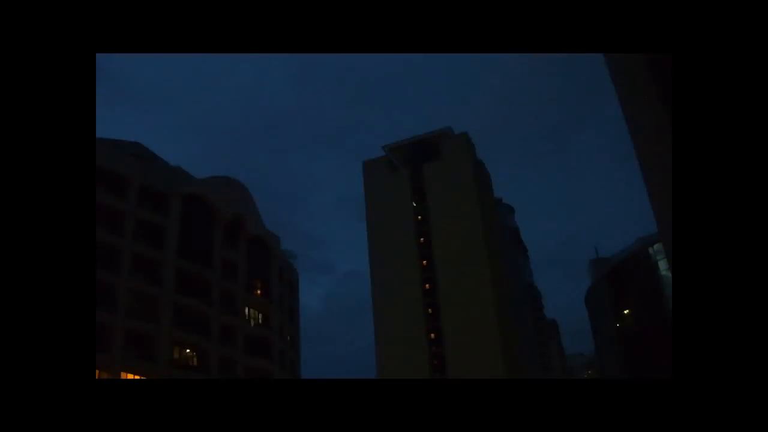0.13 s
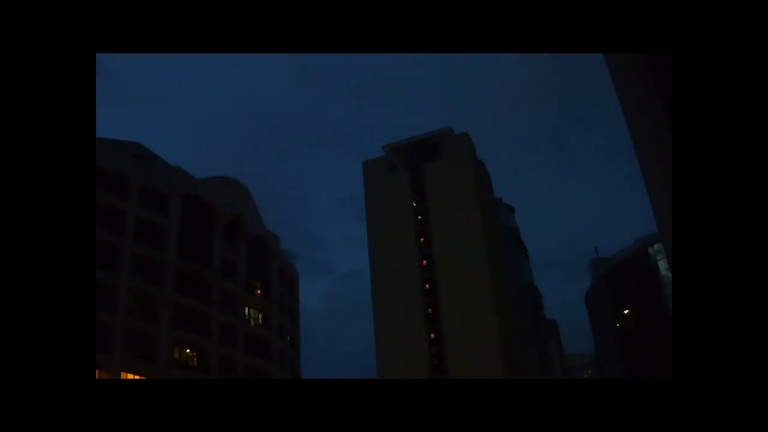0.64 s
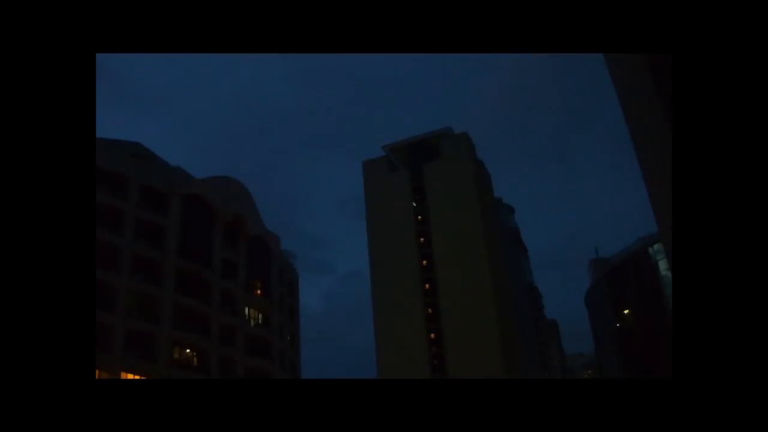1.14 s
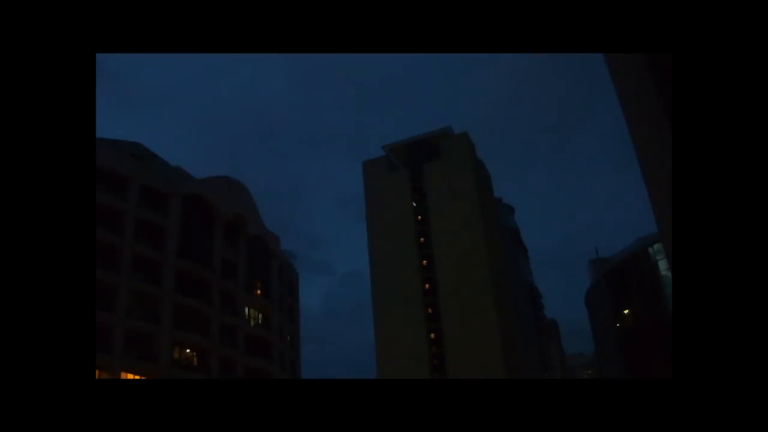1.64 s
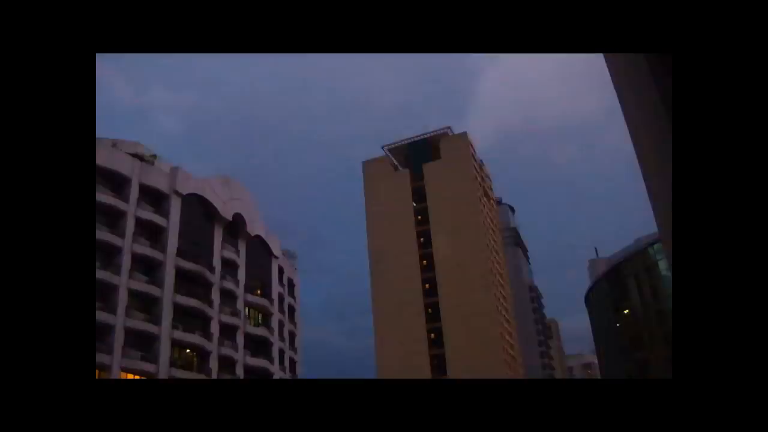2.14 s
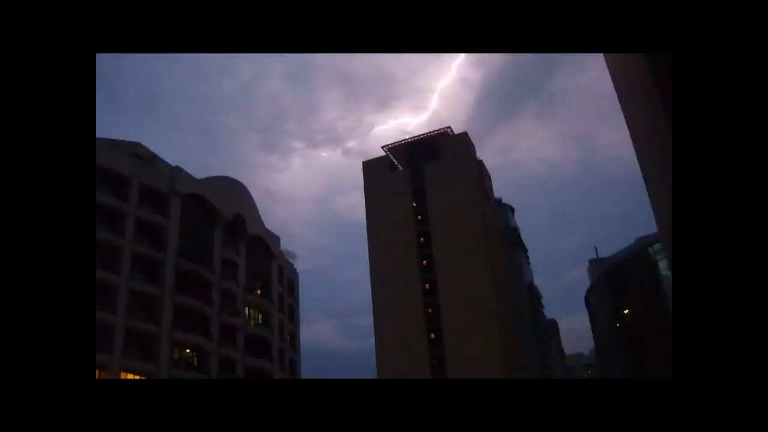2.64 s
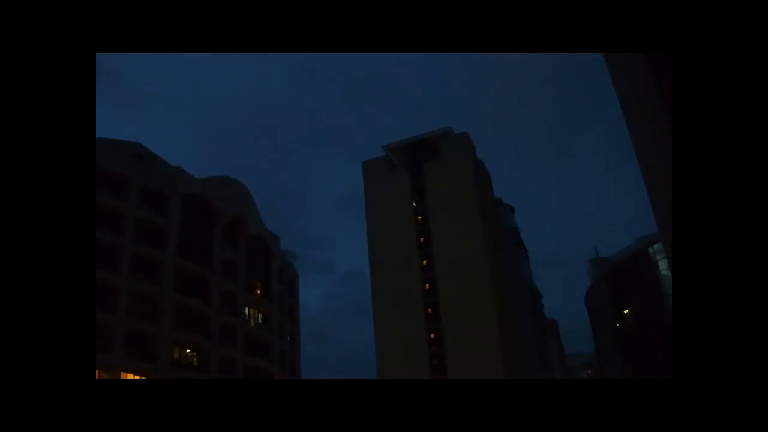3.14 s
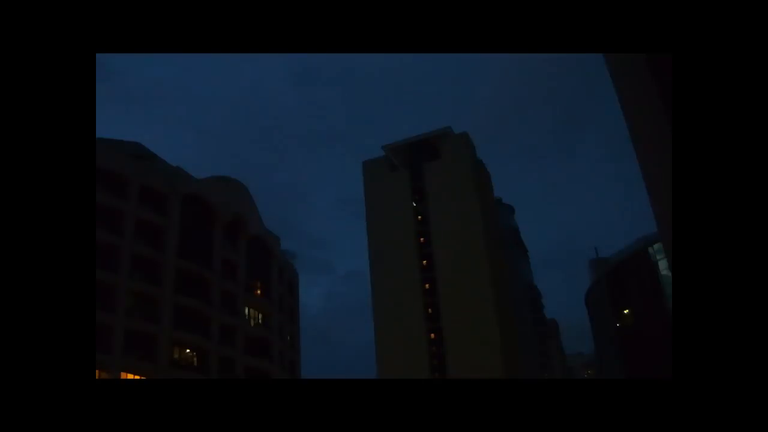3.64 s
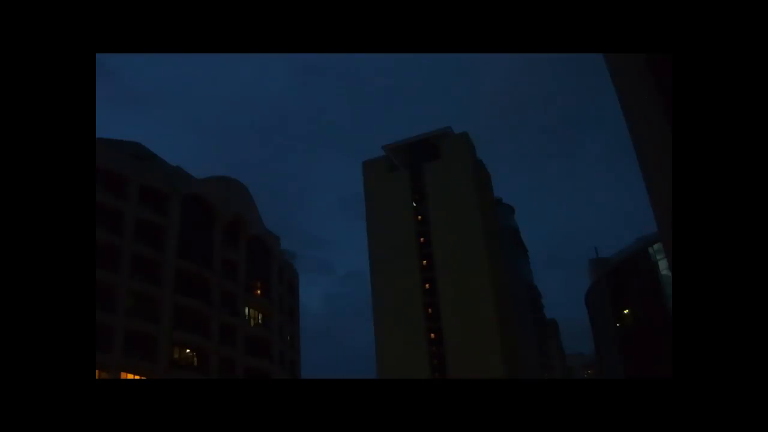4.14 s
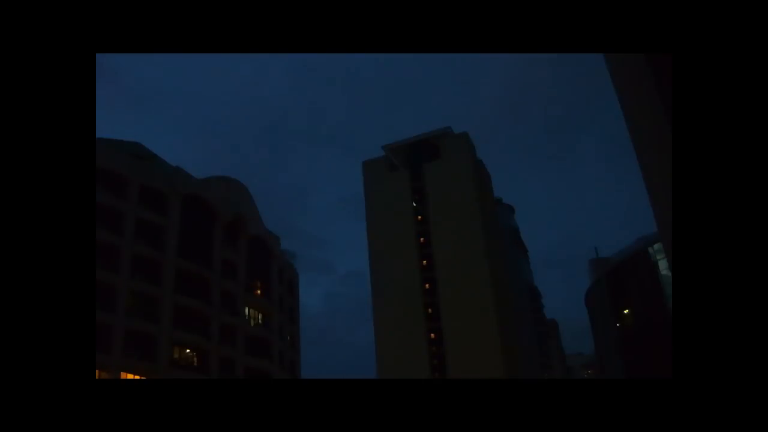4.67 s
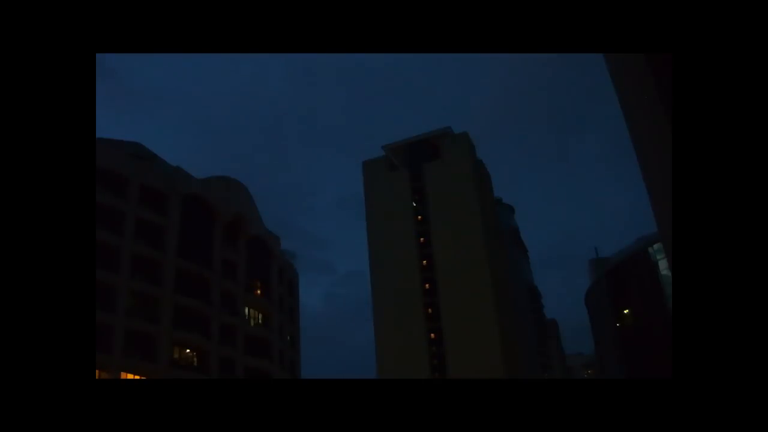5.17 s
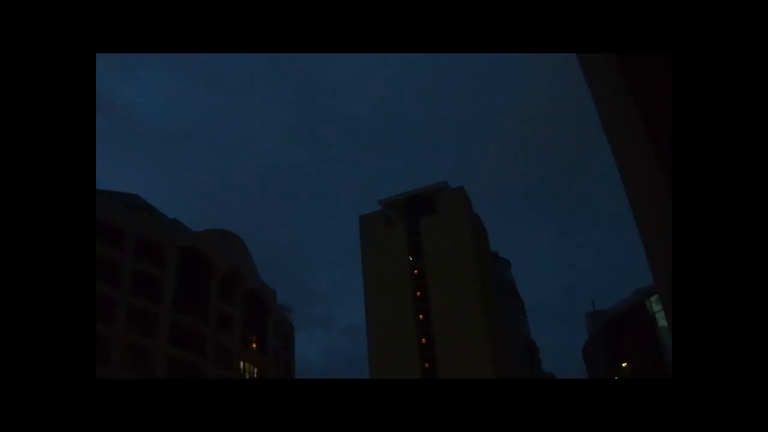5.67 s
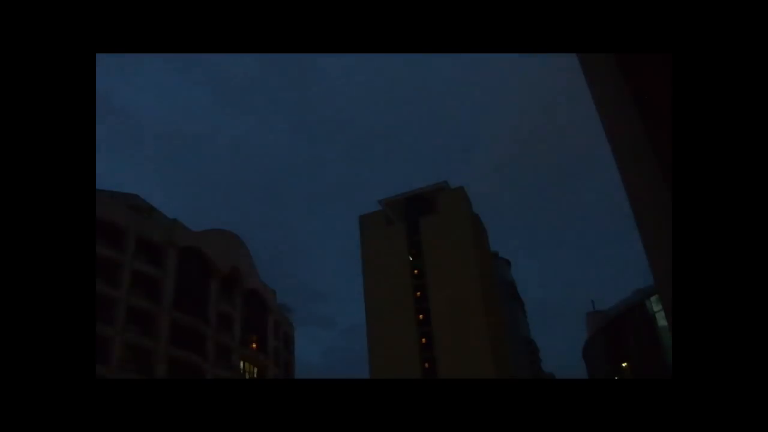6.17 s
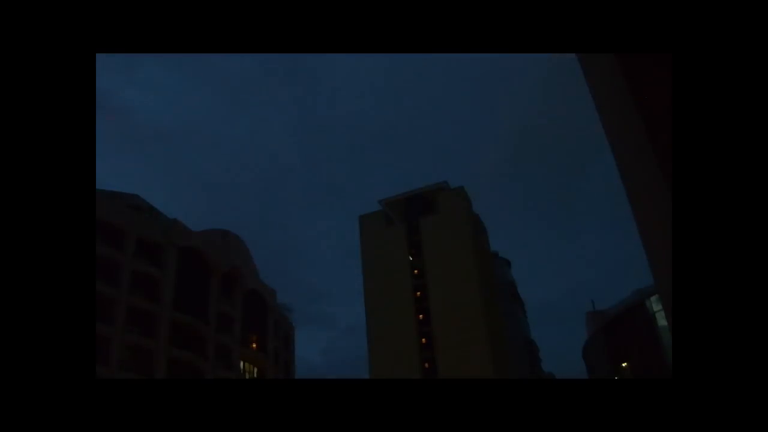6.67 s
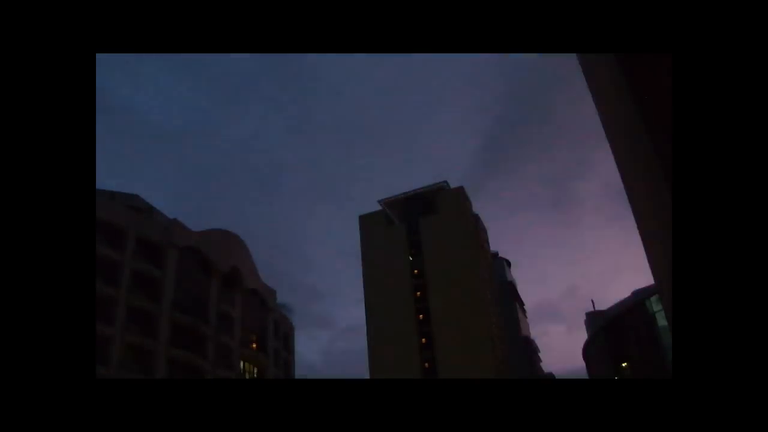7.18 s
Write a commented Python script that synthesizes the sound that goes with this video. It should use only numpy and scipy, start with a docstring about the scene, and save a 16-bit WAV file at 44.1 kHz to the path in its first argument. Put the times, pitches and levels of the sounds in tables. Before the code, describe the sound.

A stereo outdoor microphone picks up steady rain, faint at first and slowly growing, with crisp heavy drops spattering close by, more often on the left. A low faint tone hides beneath. Thunder bursts in at about 2.3 seconds, crackling and booming in ragged waves, briefly thinning near four seconds, then returning deeper and peaking sharply near 6.4. It sounds compressed and gritty, with tight building reflections.

```python
"""Steady rain fades in among tall buildings: filtered noise for far drops, noise puffs for nearer ones.
A faint wavering tone lies under it, and from 0.4 s large near drops splash left and right.
From 2 s thunder rolls in waves and cracks: swarms of N-shaped shock waves from a crooked channel,
echoed by the walls and flattened where they overload the microphone."""
import sys
import numpy as np
from scipy import signal
from scipy.fft import rfft, irfft
from scipy.io import wavfile
from scipy.ndimage import uniform_filter1d

SR = 44100
rng = np.random.default_rng(int(sys.argv[2]) if len(sys.argv) > 2 else 0)


def boost(x):
    """Linear amplitude factor 10**(x/20) for a level x in decibels (scalar or array-like)."""
    u = np.asarray(x, float) / 20
    return 10 ** u


def digitize_waveform(pressure):
    """Quantize a signal to 16-bit integers and store it at the path in sys.argv[1].

    Rows of a 2-D input are taken as channels; values are limited to [-1, 1].
    """
    field = np.atleast_2d(pressure).T
    bounded = np.clip(field, -1, 1)
    quanta = np.round(bounded * 32767).astype(np.int16)
    wavfile.write(sys.argv[1], SR, quanta)


N = 321930

# sudden thunder claps, each from a stretch of channel at one distance, with a swell of rumble around it:
# start_s, peak_db (ahead of the overload), centre_hz, t60_s, swell_db
THUNDER_CLAPS = [(2.296, -25, 480, 0.04, -42), (2.38, -24.5, 500, 0.028, -48),
                 (2.407, -17.5, 277, 0.047, -35), (2.435, -23, 330, 0.16, -12),
                 (2.491, -11.5, 160, 0.054, -25), (2.558, -7, 425, 0.11, -21), (2.628, -11, 300, 0.15, -24),
                 (2.651, -13, 173, 0.049, -31), (2.689, -11, 425, 0.07, -40), (2.785, -24, 288, 0.054, -33),
                 (2.905, -8, 303, 0.062, -26), (2.95, -15.5, 360, 0.13, -36),
                 (3.079, -18.5, 452, 0.089, -30), (3.128, -11, 288, .06, -28),
                 (3.163, -7.5, 428, 0.057, -29), (3.204, -14, 425, 0.15, -27), (3.261, -13, 400, .05, -28),
                 (3.289, -10, 455, .13, -14), (3.346, -8.5, 270, 0.089, -15), (3.385, -8, 336, 0.11, -23),
                 (3.493, -9, 338, 0.12, -39), (3.604, -15, 186, 0.12, -25.5), (3.72, -15, 278, .08, -26),
                 (3.773, -9.5, 250, .07, -26), (4.013, -24, 373, .11, -32), (4.09, -22.5, 380, .1, -35),
                 (4.128, -19, 354, 0.09, -36), (4.34, -20.5, 460, 0.23, -48),
                 (4.491, -22, 347, 0.047, -29.5), (4.75, -20, 230, .1, -26), (4.788, -9, 238, 0.075, -25),
                 (4.916, -12, 247, 0.061, -35), (5.164, -15.5, 121, .073, -31),
                 (5.26, -14, 314, 0.059, -21), (5.32, -16.5, 260, .08, -29), (5.395, -8, 187, 0.037, -17.5),
                 (5.424, -9, 274, 0.085, -37), (5.492, -16, 234, 0.11, -38), (5.701, -12, 283, 0.072, -30),
                 (5.755, -13.5, 121, .068, -34), (5.842, -10.5, 177, 0.22, -21.5),
                 (6.1, -21, 330, .15, -23), (6.19, -15, 275, 0.12, -14.5), (6.258, -9.5, 300, 0.093, -29),
                 (6.358, -20, 383, 0.15, -16), (6.408, -3.5, 348, .086, -14), (6.428, 0.5, 420, 0.03, -19),
                 (6.465, -11, 200, .12, -21), (6.644, -10.5, 200, 0.1, -16.5), (6.688, -8, 292, .16, -19),
                 (6.855, -11.5, 397, 0.074, -36), (6.934, -5.5, 370, 0.084, -21),
                 (7.02, -15.5, 261, 0.11, -26), (7.136, -9.5, 300, 0.13, -25),
                 (7.15, -10.5, 405, 0.094, -23.5), (7.221, -10.5, 252, 0.072, -27.5),
                 (7.275, -7.5, 182, 0.048, -17.5)]
MIDDLE_HZ = 300  # claps centred below this count as deep


def read(points, hz):
    """Spectral interpolation: dB between given points, along a logarithmic frequency axis."""
    point_hz, value = np.transpose(points)
    return np.interp(np.log(hz + 1), np.log(point_hz + 1), value)


def evened(x):
    """Power normalisation: scales the whole array to rms 1."""
    return x / np.sqrt(np.mean(x ** 2) + 1e-20)


def colour(x, points):
    """Minimum-phase filtering: a causal response with the given dB spectrum, by folding the cepstrum."""
    log_gain = np.log(boost(read(points, np.fft.rfftfreq(8192, 1 / SR))))
    cepstrum = irfft(log_gain)
    cepstrum[1:4096] *= 2
    cepstrum[4097:] = 0
    response = irfft(np.exp(rfft(cepstrum)))[None, :4096]
    return signal.oaconvolve(x, response, axes=1)[:, :x.shape[1]]


def clicks(per_s, spread_db, channels=2):
    """Random arrivals: sparse impulses of either sign, most small, a few large."""
    size = boost(spread_db * np.minimum(rng.exponential(1, (channels, N)), 4.5))
    arrives = rng.random((channels, N)) < per_s / SR
    return size * arrives * rng.choice([-1, 1], (channels, N))


def fade_in():
    """Gain envelope: a quick ramp that opens from near silence, times a slow ramp to the full level."""
    open_start_s, open_s, slow_s = 0.11, 0.39, 4.81
    full_db = -30  # gain at the top of both ramps
    t = np.arange(N) / SR
    quick = np.clip((t - open_start_s) / open_s, 1e-5, 1)
    slow = np.clip(t / slow_s, 1e-2, 1)
    return boost(full_db) * quick * slow


def wash():
    """Incoherent superposition: countless far drops merge into noise with drifting patches and flicker."""
    # relative spectrum of far rain: frequency_hz, density_db
    rain_spectrum = [(18, -50), (45, -34), (100, -20), (170, -22), (486, -3.5), (844, 2), (1540, -2.5),
                     (2410, 0.5), (3100, -6), (4420, -2), (7000, -8), (10500, -7), (14000, -12.5),
                     (17000, -12)]
    # stereo balance of far rain: frequency_hz, left_minus_right_db
    rain_balance = [(60, 10), (180, -11), (550, 3), (1650, 5), (4970, 3), (15000, 3.5)]
    frames, hz = N // 256 + 5, np.fft.rfftfreq(1024, 1 / SR)
    draws = rng.standard_normal((4, 2, frames, 513))
    real, imaginary, patches, flicker = draws.transpose(0, 1, 3, 2)  # each: side, frequency, time
    patches = uniform_filter1d(patches, size=12, axis=1)
    patches = evened(uniform_filter1d(patches, size=12, axis=2))
    flicker = evened(uniform_filter1d(flicker[:, :1], size=8, axis=2))
    flicker = flicker * np.clip(hz / 7000, .3, 1)[:, None]  # one course per side, strongest in the treble
    lean = np.array([[.5], [-.5]]) * read(rain_balance, hz)
    db = (read(rain_spectrum, hz) + lean)[..., None] + 1.58 * patches + 1.8 * flicker
    spectra = (real + 1j * imaginary) * boost(db)
    return evened(signal.istft(spectra, nperseg=1024, noverlap=768)[1][:, :N])


def splash(hz, t60, octaves, count=2000):
    """Damped band noise: a puff around hz that dies exponentially, peak 1 on each side."""
    t = np.arange(count) / SR
    envelope = boost(-60 * t / t60) * np.minimum(t / 0.00057, 1)
    puff = rng.standard_normal((2, count)) * envelope
    away = np.log2((np.fft.rfftfreq(count, 1 / SR) + 1) / hz) / octaves
    puff = irfft(rfft(puff) * np.exp(-.5 * away ** 2))
    return puff / abs(puff).max(axis=1, keepdims=True)


def shower(per_s, spread_db, low_hz, high_hz, t60, octaves, count=10):
    """Shot noise: random arrivals each set off a splash, over a range of pitches and lengths."""
    pitches = np.geomspace(low_hz, high_hz, num=count)
    lengths = t60 * rng.permutation(np.geomspace(.4, 2.5, num=count))
    total = np.zeros((2, N))
    for hz, length in zip(pitches, lengths):
        arrivals = clicks(per_s / count, spread_db)
        total += signal.oaconvolve(arrivals, splash(hz, length, octaves), axes=1)[:, :N]
    return evened(total)


def patter():
    """Shot noise of middle-distance drops: bright fizz and duller taps, independent on each side."""
    fizz = shower(100, 3.8, 6500, 13500, t60=.016, octaves=.55)
    taps = shower(110, 3.6, 650, 6000, t60=.014, octaves=.35)
    return boost([[-8.5], [-11.5]]) * fizz + boost([[-10.], [-14.]]) * taps  # left, right


def hum():
    """Amplitude modulation: a thin sine whose strength wavers slowly, apart on each side."""
    # faint tone, amplitudes relative to the rms of the far rain: pitch_hz, left_db, right_db
    tone_settings = (97, -46, -32)
    hz, *side_db = tone_settings
    waver_db = 1.5 * evened(uniform_filter1d(rng.standard_normal((2, N)), size=5000))
    return boost(np.array(side_db)[:, None] + waver_db) * np.sin(2 * np.pi * hz * np.arange(N) / SR)


def drops():
    """Impact noise: each large drop is a short tick and a longer spray, panned by level difference."""
    # large near drops: start_s, tick_peak_db (mean of the sides in dB), left_minus_right_db, centre_hz
    near_drops = [(0.389, -48, 7, 1200), (0.402, -41, 15, 9650), (0.613, -31, -8, 9120),
                  (0.802, -39.5, 12, 880), (0.862, -33, -4, 8040), (1.039, -33, 15, 9530),
                  (1.142, -31, 1.5, 11000), (1.233, -36.5, 14, 2220), (1.288, -35, -11, 8970),
                  (1.343, -36, 15, 9750), (1.547, -35, 11, 9160), (1.592, -37, 10, 1070),
                  (1.66, -28, 6.5, 12500), (1.682, -31, 17, 9500), (1.904, -32, -8, 12600),
                  (1.925, -23.5, -4, 8950), (2.016, -27, 14, 9300), (2.183, -26, 16.5, 4180),
                  (2.258, -28.5, 8, 2110), (2.338, -20, 7, 12000), (2.478, -24, 10, 11800),
                  (2.673, -30, -11, 8110), (3.152, -23, 16, 10000), (3.443, -27.5, 18, 10600),
                  (3.526, -20, 14, 10000), (3.762, -22, 11, 9440), (3.834, -29, 21, 8650),
                  (3.932, -21, -15, 9100), (4.029, -22, -1, 9000), (4.048, -23, 5, 9000),
                  (4.164, -17, 3, 9490), (4.359, -27.5, 11, 2500), (4.445, -20.5, 3, 5570),
                  (4.606, -20, 0.1, 9000), (4.851, -17, 13, 12600), (5.002, -21.5, 16, 4030),
                  (5.055, -25, 16, 10200), (5.101, -20, 5, 7500), (5.445, -25, -15, 9500),
                  (5.581, -24, 5, 5550), (5.73, -20, 18, 11600), (5.808, -24.5, 16, 10800),
                  (6.093, -25, 6, 2260), (6.104, -16, 14.5, 10300), (6.214, -20, 12, 8500),
                  (6.306, -19, -10, 10000), (6.34, -21, 15, 9560), (6.412, -20, 5, 9500),
                  (6.622, -17, 7, 10500), (6.704, -14, -10, 10100), (6.742, -16, 5.5, 9510),
                  (7.023, -25, 19, 10600), (7.045, -23, 13, 4800)]
    out = np.zeros((2, N + 2000))
    for start_s, db, pan_db, hz in near_drops:
        tick = splash(hz, 0.026, .6 if hz > 4000 else .3)  # low drops ring narrower
        spray = boost(-11) * splash(hz, 0.24, 0.36)
        side_db = db + np.array([[.5], [-.5]]) * pan_db
        out[:, round(start_s * SR):][:, :2000] += (tick + spray) * boost(side_db)
    return out[:, :N]


def shock(ms):
    """Weak-shock N-wave: a jump up, a slope down, a jump back."""
    return np.linspace(1, -1, max(round(ms * SR / 1000), 4))[None]


def walls(same, t60=0.081, echo_db=-6):
    """Multiple reflection: direct sound plus sparse dying echoes, partly different for each side."""
    t = np.arange(SR // 4) / SR
    sparse = rng.choice([-1, 1], (3, len(t))) * (rng.random((3, len(t))) < .04)
    shared, left, right = sparse * boost(-60 * t / t60)
    direct = boost(echo_db) * shared / np.linalg.norm(shared) + (t == 0)
    same = np.clip(same, 0, 1)  # share of the power common to both sides
    own = np.array([left, right]) / np.linalg.norm(left) * np.linalg.norm(direct)
    return np.sqrt(same) * direct + np.sqrt(1 - same) * own


def curve(rows):
    """Linear interpolation of a table's columns in time, sample by sample; -130 ahead of its first row."""
    start_s, *columns = np.transpose(rows)
    return [np.interp(np.arange(N) / SR, start_s, column, left=-130) for column in columns]


def rumble(size=64):
    """Power addition: steady roll plus a swell per clap give three shock strengths and a centre Hz."""
    # steady rumble between the claps, ahead of the family levels:
    # start_s, level_db, long_db (long shocks over level; applies to the swells too)
    steady_roll = [(2.05, -58.5, -6), (2.392, -45, -19), (2.41, -29, -20), (2.75, -26.5, -18),
                   (3.0, -30.5, -27), (3.3, -23, -14), (3.58, -28, -20), (3.9, -30.5, -27),
                   (4.25, -35.5, -18), (4.65, -34.5, -14), (5.0, -28, -8), (5.25, -24, -6.5),
                   (5.6, -25, -7.5), (5.85, -24.5, -8), (6.06, -29, -11.5), (6.3, -21, -3.5),
                   (6.58, -22, -9), (7.05, -28, -4.5), (7.3, -34, 3)]
    rise_s, lag_s = .018, .02  # a swell tops just after its clap
    base_t60_s, t60_per_clap_t60 = 0.27, 1.34  # and lasts longer behind a longer clap
    long_db_per_octave, short_db_per_octave = -2, 1.5  # deep claps: more long shocks, fewer short
    swell_short_db, roll_short_db = -6.5, -5  # short shocks over level
    start_hz, sag_hz_per_s = 432, 26.4  # later thunder comes from further off, so the roll sinks
    t = np.arange(0, N + size, size) / SR
    level_db, long_db = (np.pad(c, (0, size), "edge")[::size][:len(t)] for c in curve(steady_roll))
    clap_s, _, hz, clap_t60, swell_db = np.transpose(THUNDER_CLAPS)[..., None]
    late = t - clap_s - lag_s
    rise = np.exp(-(np.minimum(late, 0) / rise_s) ** 2)
    decay_db = -60 * np.maximum(late, 0) / (base_t60_s + t60_per_clap_t60 * clap_t60)
    swells = boost(swell_db + decay_db) ** 2 * rise
    steady, octaves = boost(level_db) ** 2, np.log2(hz / MIDDLE_HZ)
    middle = steady + swells.sum(axis=0)
    long_swells = swells * boost(long_db_per_octave * octaves) ** 2
    long = boost(long_db) ** 2 * (steady + long_swells.sum(axis=0))
    short_swells = swells * boost(swell_short_db + short_db_per_octave * octaves) ** 2
    short = steady * boost(roll_short_db) ** 2 + short_swells.sum(axis=0)
    # the centre is the mean pitch, weighted by power
    centre_hz = (steady * (start_hz - sag_hz_per_s * t) + (swells * hz).sum(axis=0)) / middle
    *power, centre_hz = (np.interp(np.arange(N) / SR, t, c) for c in (long, middle, short, centre_hz))
    return np.sqrt(power), centre_hz


def roll():
    """Superposed N-waves: every bend of the channel sends a shock; three families swell together."""
    # shock families, long to short:
    # shortest_ms, longest_ms, shocks_per_s, size_spread_db, level_db, left_right_likeness (0 to 1)
    shock_families = [(4.8, 22.4, 260, 4.5, -3, 0.96), (1.62, 6.47, 700, 2, -2.5, 0.97),
                      (0.42, 1.617, 1800, 1.5, -1.57, 0.96)]
    # colour of each family after air, walls and microphone, one list a family: frequency_hz, gain_db
    family_colours = [
        [(12, -6), (30, -10), (60, 3.5), (110, 19), (160, 12), (300, -60), (900, -86)],
        [(50, -45), (120, -9), (230, 1.5), (450, 4), (800, -8), (2000, -40.5)],
        [(250, -26), (600, 3.5), (1200, -3), (2300, -9.5), (3200, -11), (6000, -28)],
    ]
    strengths, centre_hz = rumble()
    out = np.zeros((2, N))
    for k, (strength, tone, family) in enumerate(zip(strengths, family_colours, shock_families)):
        short_ms, long_ms, per_s, spread_db, db, same = family
        lengths, power, shaped = np.geomspace(short_ms, long_ms, num=9), 0, 0
        # the middle family favours the lengths whose energy peaks near the moving centre
        octaves = np.log2(640 / lengths[:, None] / np.maximum(centre_hz, 100))
        share = np.exp(-(k == 1) * (octaves / 0.89) ** 2) + 1e-6
        share /= np.sqrt((share ** 2).mean(axis=0))
        for ms, weight in zip(lengths, share):
            train = abs(clicks(per_s / 9, spread_db, channels=1))
            # each length has its own echoes
            echoed = signal.fftconvolve(walls(same, echo_db=-10.0), shock(ms), axes=1)
            heard = colour(echoed, tone)
            heard /= np.linalg.norm(heard[0])
            power += (train ** 2).mean()
            shaped += signal.oaconvolve(train * strength * weight, heard, axes=1)[:, :N]
        out += boost(db) * shaped / np.sqrt(power)
    return out


def claps(count=12000):
    """Near-equal path lengths: shocks from one stretch of channel arrive in a tight, dying bunch."""
    # colour of a clap centred at MIDDLE_HZ: frequency_hz, gain_db
    crack_colour = [(15, -22), (60, -19), (200, -0.5), (700, -5.5), (2000, -11), (3500, -43), (8000, -78)]
    out, t = np.zeros((2, N + count)), np.arange(count) / SR
    for start_s, db, hz, t60, _ in THUNDER_CLAPS:
        arrivals = rng.random((3, count)) < 330 / SR  # 330 per s for each of three shock lengths
        arrivals[:, 0] = True
        sizes = arrivals * rng.uniform(0.22, 1, (3, count)) * boost(-60 * t / max(t60, .02))
        sizes *= np.clip(t / 0.007, .35, 1)  # the bunch builds over a few ms
        bunch = sum(signal.fftconvolve(size[None], shock(660 / hz * stretch))[:, :count]
                    for size, stretch in zip(sizes, (.55, .95, 1.3)))
        echoed = signal.fftconvolve(walls(0.98, echo_db=-5.5), bunch, axes=1)[:, :count]
        shift = (hz / MIDDLE_HZ) ** 0.41  # deep claps are duller
        heard = colour(echoed, crack_colour * np.array([shift, 1]))
        out[:, round(start_s * SR):][:, :count] += boost(db) * heard / abs(heard).max()
    return out[:, :N]


def scene():
    """Soft saturation: thunder pressed against a ceiling that rises with the rain's fade, plus drops."""
    overload_db, offset_db = 22.5, -33  # ceiling and steady negative offset, over the far rain's rms
    fade = fade_in()
    ceiling = fade * boost(overload_db)
    rain = wash() + patter() + hum() - boost(offset_db)
    push = (roll() + claps()) / ceiling
    thunder = ceiling * push / (1 + push ** 4) ** .25
    return fade * rain + drops() + thunder


def band_limit(x):
    """A steep low-pass at the top of the band."""
    return signal.sosfilt(signal.butter(12, 16810, fs=SR, output="sos"), x)


def record(dry):
    """Linear-phase low-pass filtering: a steep band limit at 15790 Hz finishes the mix."""
    edge = signal.firwin(1001, 15790, window=("kaiser", 9), fs=SR)[None]
    mix = signal.oaconvolve(dry, edge, "same", axes=1)
    return band_limit(mix)


dry = scene()
out = record(dry)
digitize_waveform(out)
```